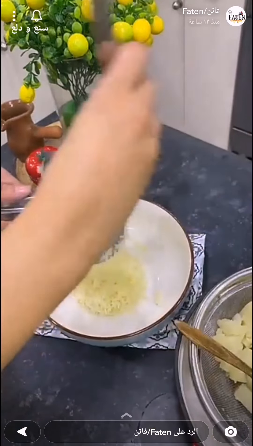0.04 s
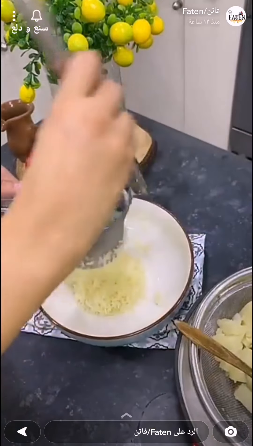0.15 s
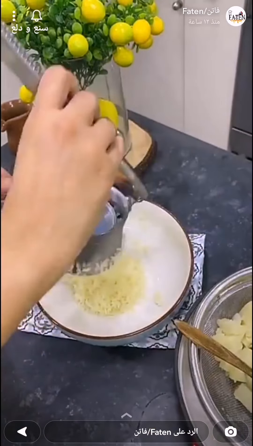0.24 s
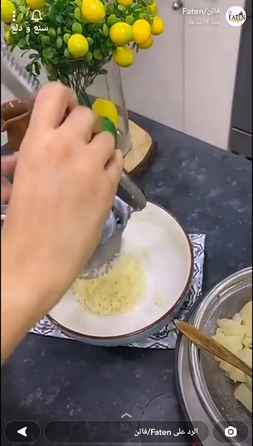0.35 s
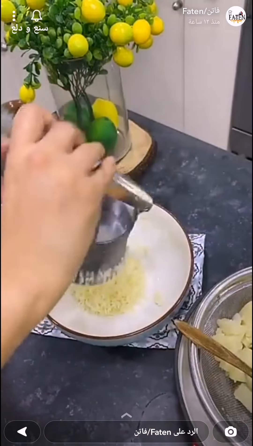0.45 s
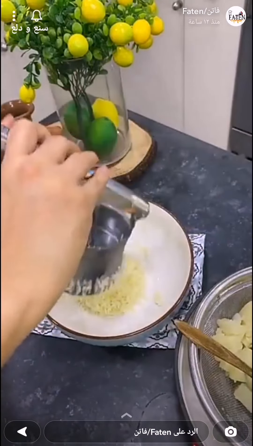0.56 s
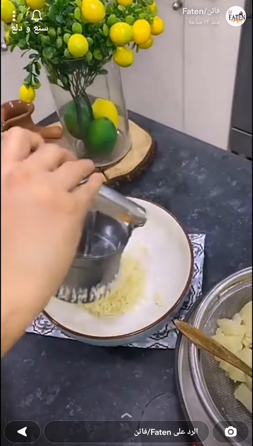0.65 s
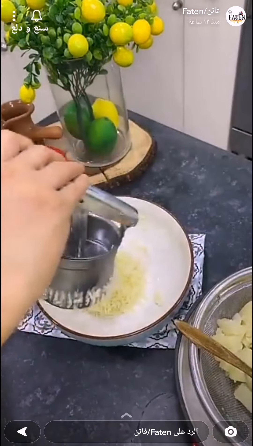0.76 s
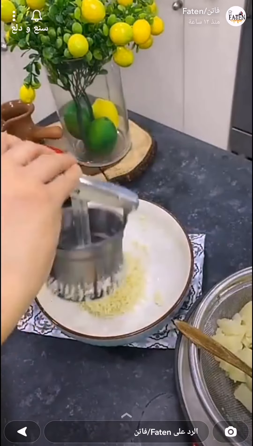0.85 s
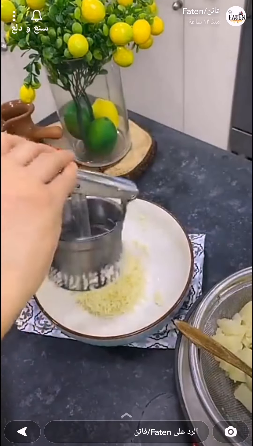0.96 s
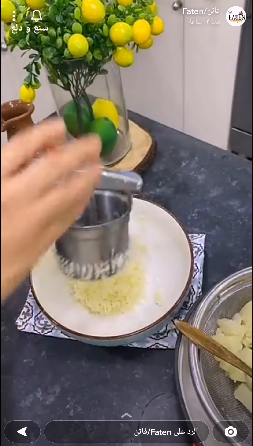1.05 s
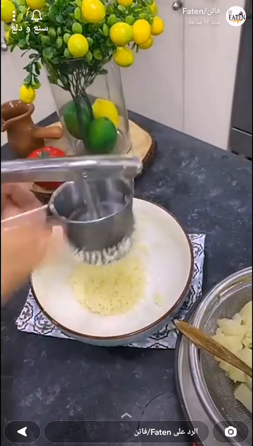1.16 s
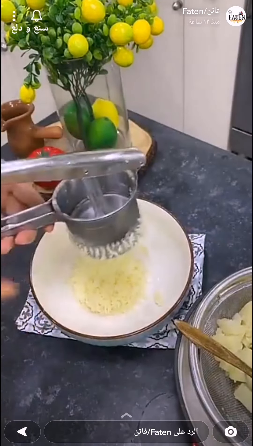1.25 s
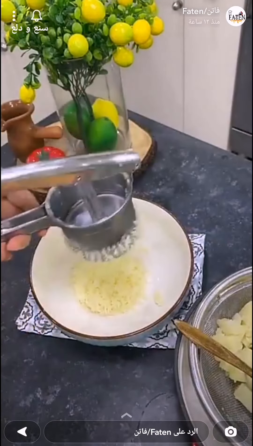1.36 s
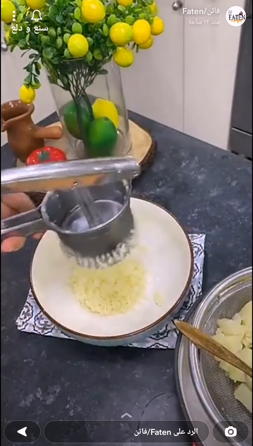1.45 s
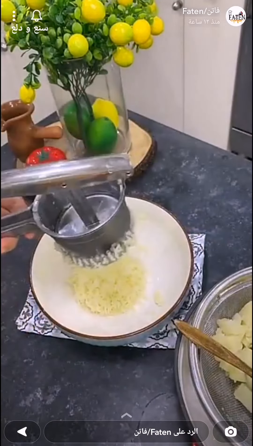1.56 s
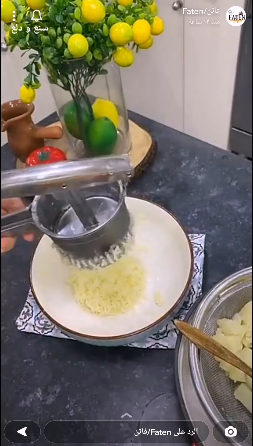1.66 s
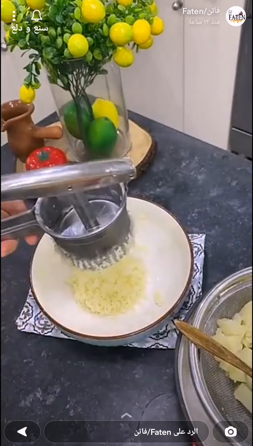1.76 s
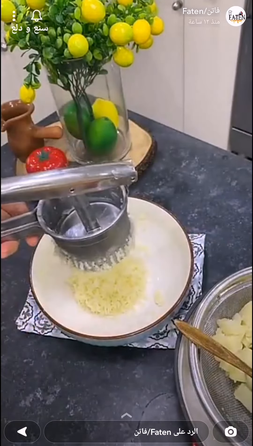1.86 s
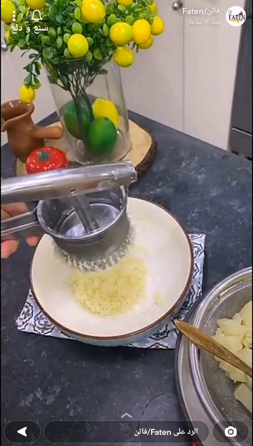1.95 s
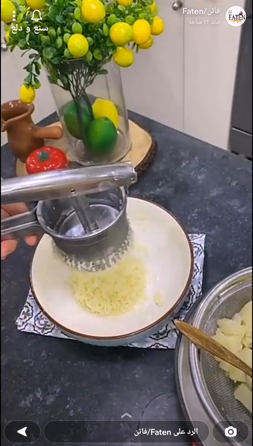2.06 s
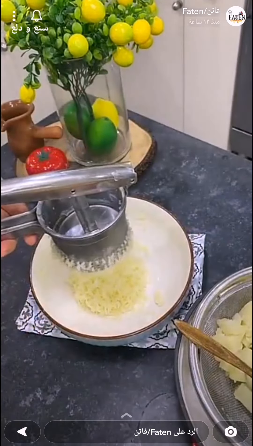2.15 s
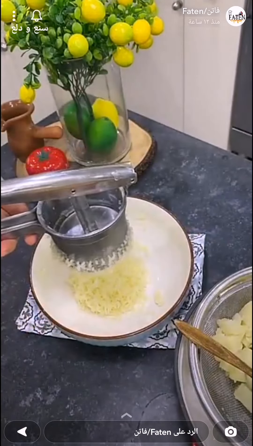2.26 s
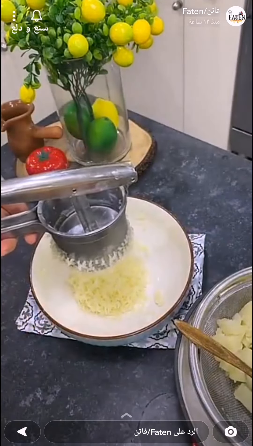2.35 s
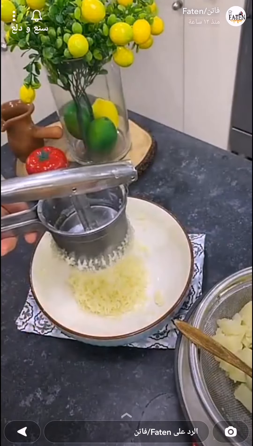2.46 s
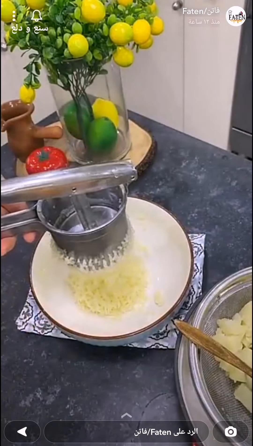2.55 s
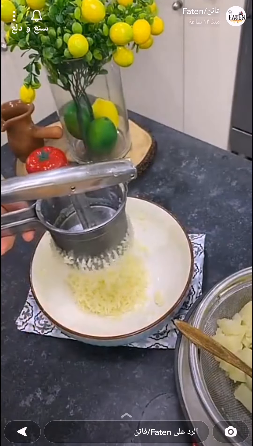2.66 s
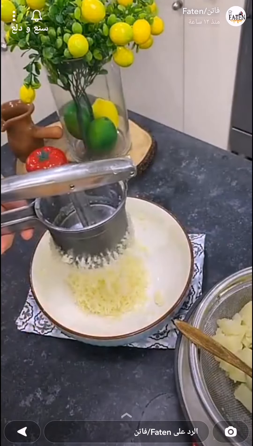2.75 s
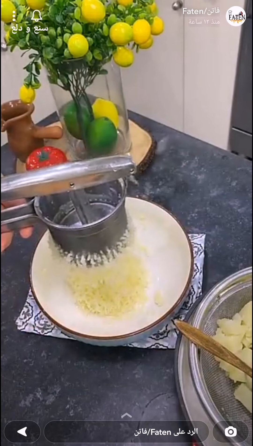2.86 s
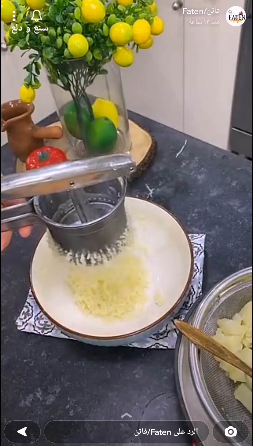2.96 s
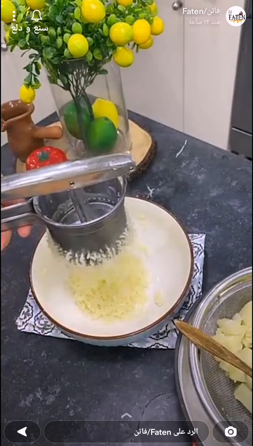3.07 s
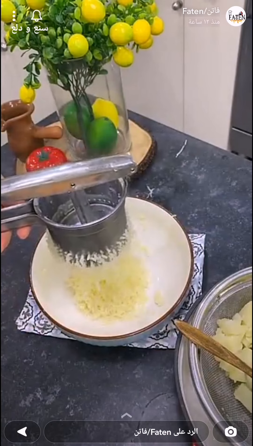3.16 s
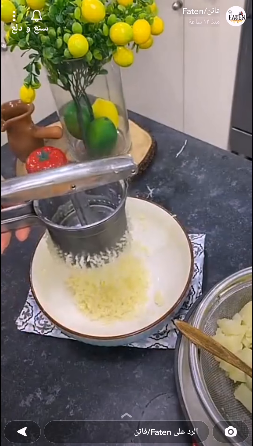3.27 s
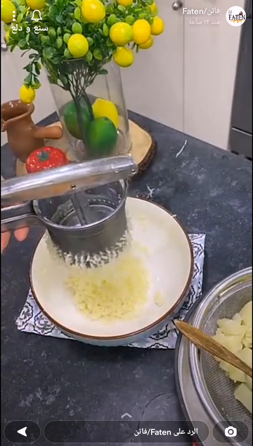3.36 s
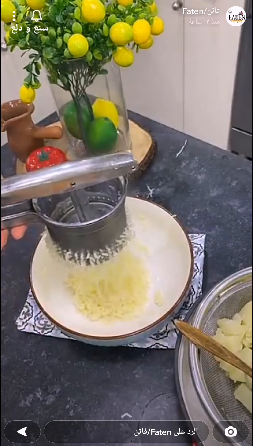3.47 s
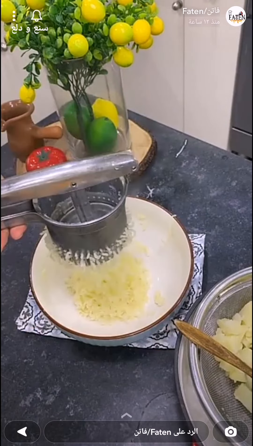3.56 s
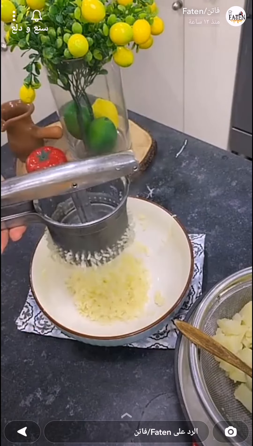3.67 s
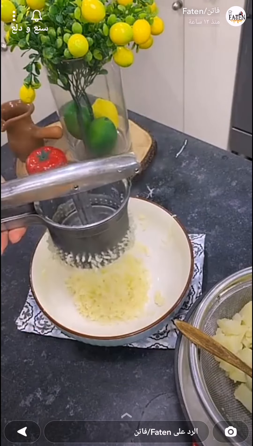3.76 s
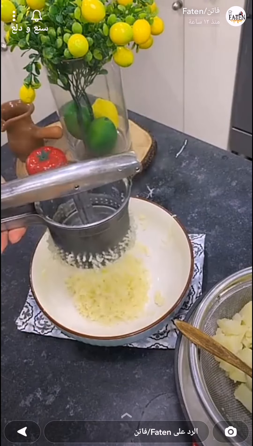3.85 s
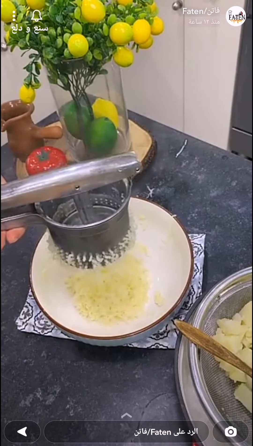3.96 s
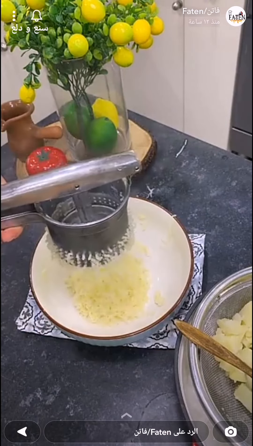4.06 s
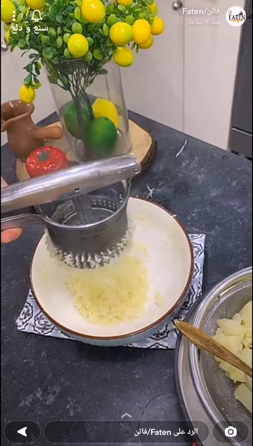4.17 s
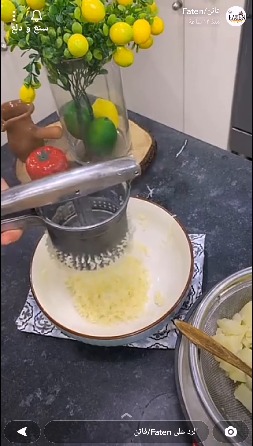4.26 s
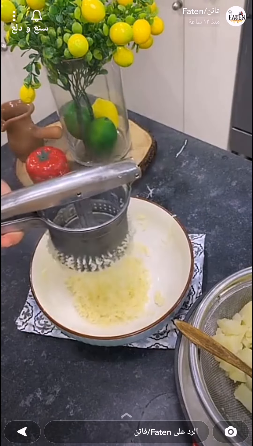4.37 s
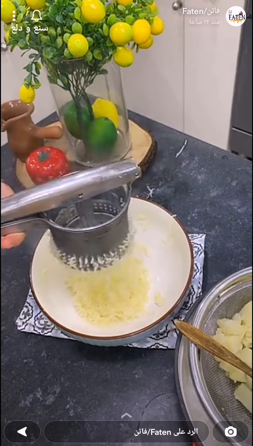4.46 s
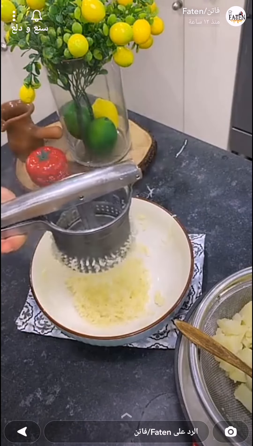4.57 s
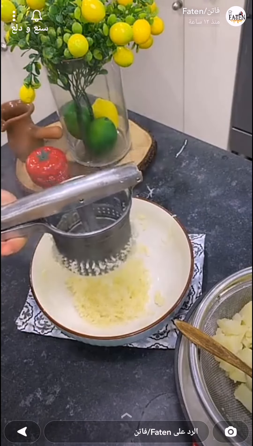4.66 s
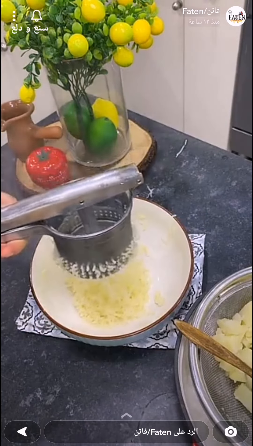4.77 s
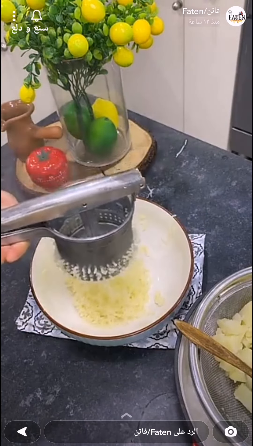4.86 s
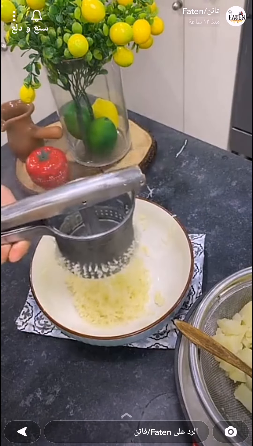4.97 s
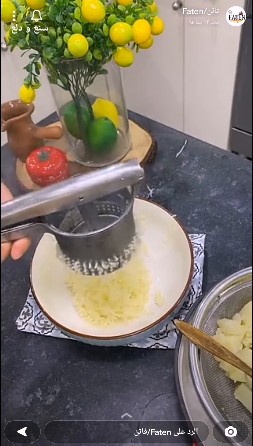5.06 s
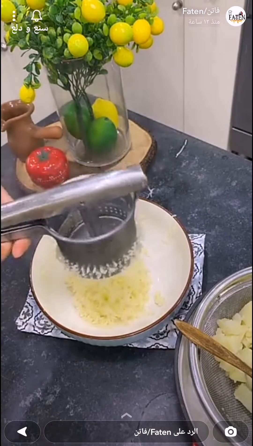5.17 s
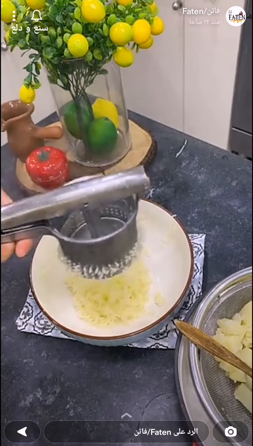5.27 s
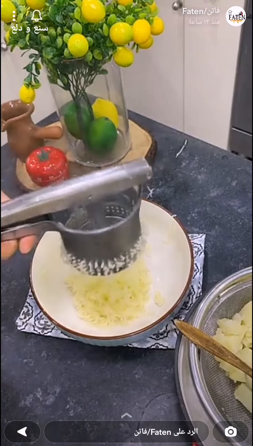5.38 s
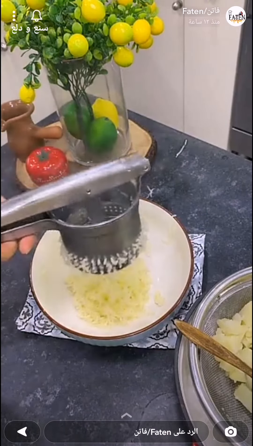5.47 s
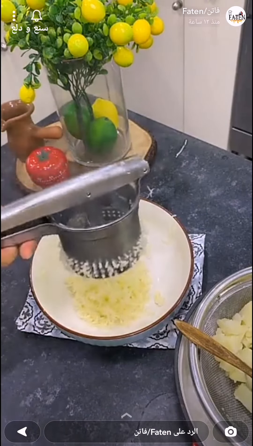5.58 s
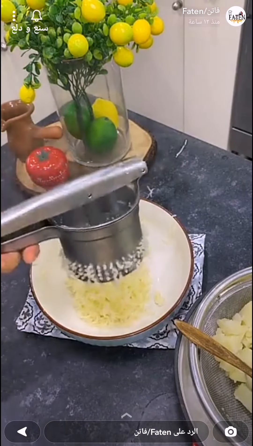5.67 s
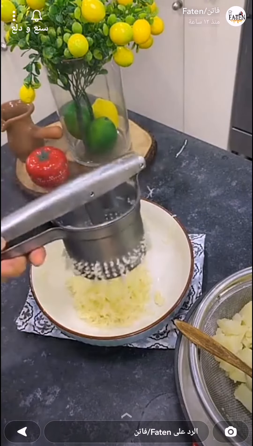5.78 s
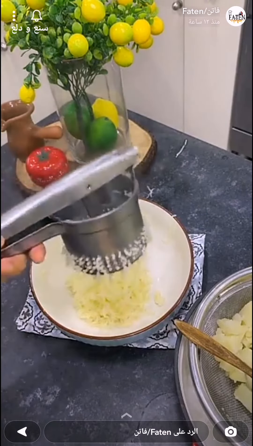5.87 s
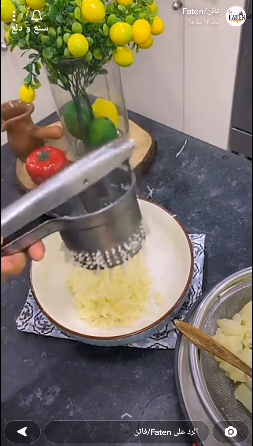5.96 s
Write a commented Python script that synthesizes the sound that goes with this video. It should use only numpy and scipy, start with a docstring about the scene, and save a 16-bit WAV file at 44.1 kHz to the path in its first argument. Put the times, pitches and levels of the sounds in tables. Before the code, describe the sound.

Close to a small microphone, the lever, plunger and cup of a metal potato ricer knock together and slide in short gritty rubs. Two bright clanks stand out, one at the start and one late, with scattered light ticks, hinge jingles and a faint wet crackle of potato between them. Each contact has a brief kitchen echo. Hands rustle faintly over a low appliance hum, and a soft bump closes it.

```python
"""Potato ricer in a kitchen

A hard-walled kitchen, one small microphone within reach of the bowl, appliances humming behind.
A steel ricer is worked by hand: lever, plunger and cup knock together and slide with short gritty
rubs, the loose hinge jingles, and potato crackles wetly through the holes. The walls give every
contact a short wash. Hands rustle faintly, and a soft low bump comes at the end."""
import sys
import numpy as np
from scipy import signal
from scipy.fft import rfft, irfft
from scipy.io import wavfile
from scipy.ndimage import uniform_filter1d

SR = 44100
rng = np.random.default_rng(int(sys.argv[2]) if len(sys.argv) > 2 else 0)


def transcribe(signal):
    """Save signal, clipped to [-1, 1], as a 16-bit WAV file at the path in sys.argv[1]."""
    frames = np.atleast_2d(signal).T
    limited = np.clip(frames, -1, 1)
    pcm = np.round(limited * 32767).astype(np.int16)
    wavfile.write(sys.argv[1], SR, pcm)


N = 265464

# spectrum of the room tone: f/Hz, relative level/dB
ROOM_SPECTRUM = [(24, -54), (40, -13.5), (121, 0), (256, -12.5), (392, -13), (697, -19), (896, -18.5),
                 (1720, -27), (2050, -27), (5180, -53), (6650, -50), (7730, -57), (14500, -35),
                 (15700, -43)]
# wavering appliance tones: f/Hz, width/Hz, level/dB
APPLIANCE_HUMS = [(58.8, 5.3, -74), (89, 15, -65.5), (119.24, 3.7, -64), (206.3, 3.5, -76.5),
                  (290.9, 20, -69.5), (706.5, 15.3, -73.5), (6810, 13, -82)]
# rustle of hands: t/s, level/dB
HAND_LEVELS = [(0.0, -81), (1.1, -74.5), (2.4, -78), (6.02, -71)]
# crackle of potato in the holes: t/s, level/dB
MASH_LEVELS = [(1.3, -78), (1.7, -73), (2.0, -66.5), (2.3, -81), (2.8, -77), (2.95, -77), (3.6, -73),
               (4.0, -98)]
# modes of cup and lever: f/Hz, level/dB, t60/s
STEEL_MODES = [(750, 6, 0.05), (1063.5, 1, 0.33), (1116, 5, 0.11), (1220, 6.5, 0.063), (1390, 6, 0.081),
               (2085, 6.5, 0.052), (2290, 7, 0.052), (2696, -0.5, 0.11), (2940, -2.5, 0.068),
               (3900, 0.5, 0.084), (4680, -5, 0.23), (4950, -8, 0.068), (5230, -10, 0.059),
               (5600, -0.5, 0.05), (6400, -15, 0.13), (6750, -0.5, 0.13), (7200, 1, 0.056),
               (8800, -10, 0.15), (9190, -13.5, 0.015)]
# sliding contacts: full pressure t/s, hold/s, force level/dB, cup gain/dB, treble gain/dB,
# cup f/Hz, lever f/Hz, ring gain/dB, swell/ms
RUB_STROKES = [(0.0, 0.054, -61.5, -11, 0.5, 1050, 4100, 10, 40),
               (0.242, 0.025, -44, -10, 2, 1200, 4950, 4, 23),
               (0.48, 0.038, -56, 4, -19, 1200, 6400, -5, 35),
               (0.499, 0.06, -39, -1, 0.5, 1280, 2940, 0.5, 42),
               (0.525, 0.026, -43, 5.5, -14, 726, 6400, -3.5, 50),
               (1.03, 0.052, -70, 1.5, -1, 1044, 4400, 9, 76),
               (1.685, 0.13, -55, -6, -0.5, 1290, 2240, -20, 53),
               (1.939, 0.11, -55.5, -2.5, -2, 1550, 2990, -4, 45),
               (2.066, 0.035, -42.5, -6.5, -0.5, 787, 2170, -1.5, 24),
               (2.064, 0.054, -47, -9, 2.5, 1390, 3930, -5.5, 31),
               (2.88, 0.027, -61, -8, 2.5, 1200, 4730, -1, 57),
               (2.95, 0.0094, -57.5, -4, -0.5, 1210, 2200, -6, 34),
               (3.08, 0.0073, -58, -22, 0.5, 1210, 2150, -2.5, 49),
               (3.179, 0.016, -50, 0, 2.5, 1116, 5160, -12, 13),
               (4.569, 0.048, -54.5, -17, -1, 1220, 4470, 2, 18),
               (4.968, 0.017, -44, -12, 2, 1070, 4680, -1.5, 9.9),
               (5.451, 0.061, -60, -2, 0, 1450, 2870, 1, 150),
               (5.707, 0.028, -49, -0.5, -2, 1750, 1910, -6, 53)]
# light touches on the loose hinge: t/s, peak level/dB, favoured f/Hz
HINGE_TOUCHES = [(0.001, -44.5, 6140), (0.033, -56.5, 3900), (0.499, -38, 2960), (0.512, -39.5, 3075),
                 (1.057, -57.5, 4600), (1.061, -54, 3280), (1.0896, -53.5, 3900), (1.092, -57, 4600),
                 (3.693, -53.5, 3090), (4.554, -43, 3750), (4.579, -56, 4600), (4.579, -48.5, 3270)]
# modes of the hinge: f/Hz, t60/s
HINGE_MODES = [(2960, 0.076), (3075, 0.072), (3270, 0.1), (3800, 0.059), (3880, 0.15), (4600, 0.11),
               (6200, 0.073)]
# decay of the kitchen's echo: f/Hz, t60/s
WALL_DECAY = [(500, 0.23), (1500, 0.52), (4000, 0.45), (8000, 0.44), (14000, 0.19)]
# steel striking steel: t/s, peak level/dB, cup gain/dB, treble gain/dB,
# cup f/Hz, lever f/Hz, rise/ms, ring gain/dB
KNOCK_HITS = [(0.2233, -32, -15, 6, 1200, 5900, 0.91, 3), (0.2249, -18, -6, 2, 1125, 5370, 3.9, 0),
              (0.2382, -23.5, -13, -26, 1100, 4950, 2.8, -4), (0.2977, -30, 8, -18, 1140, 2950, 4.4, 8),
              (1.0889, -42, -13, -4.5, 1220, 4000, 2, -3), (1.32, -26.5, -13, 4.5, 1030, 4270, 1.09, -19),
              (1.686, -47.5, -3, -22, 1220, 2060, 1.4, 15), (1.765, -45.5, -7, 2.5, 1290, 2700, 0.78, 4),
              (1.936, -45, -14, 2, 1210, 4100, 6, 3), (1.991, -43.5, -35, 8, 1220, 2290, 5.2, 6),
              (2.0612, -38, -11, 5, 1290, 2130, 3.2, -2), (2.0802, -36, 4, -16, 1420, 2090, 1.1, -2),
              (3.168, -34.5, -16, -2.5, 1030, 4870, 0.91, 0), (3.277, -48, 0, 6, 1220, 5000, 4.3, -4),
              (3.694, -37, 3, 3, 1000, 2520, 1.1, -2), (4.15, -53, -1, 0.5, 724, 1930, 7.9, -3),
              (4.55, -34, -4, -28, 1220, 3900, 0.7, -7), (4.566, -43, -7, -2, 1230, 5800, 3.8, 3),
              (4.579, -32.5, 6, -5, 1300, 3500, 1.7, 3.5), (4.633, -39, -4, -20, 1080, 4400, 1.9, 9),
              (4.954, -16.5, -6.5, 0.5, 1097, 4600, 3.7, 3),
              (4.9585, -16.5, -10, -7.5, 1100, 5600, 1.23, -1), (4.96, -25, -16, -16, 1070, 2290, 1.6, 0),
              (5.709, -44.5, 16, -28, 980, 2190, 4.8, -7)]
# the low bump: t/s, peak level/dB, f/Hz, swell/s
BUMP = (5.976, -46, 95, 0.013)

ROOM_DB, WALL_DB, WALL_DELAY_S = -60, -8.5, 0.0075
CUP_TOP_HZ, TREBLE_FROM_HZ = 1600, 7500   # the lever's modes lie between
DIPS_HZ, DIP_Q = [1683, 3514, 7530], 21   # pitches where the ricer's sound is faint
RUB_LEAD_S, SWELL_DB, SAG_DB_PER_S, LIFT_DB_PER_S = 0.05, 30, 38, 262
KNOCK_CREST = 6   # peak power over the mean power of the loudest moment


def from_db(db):
    return 10 ** (np.asarray(db) / 20)


def rms_one(x):
    return x / np.sqrt(np.mean(x ** 2) + 1e-20)


def at_hz(points, hz):
    return np.interp(np.log(hz), np.log(np.array(points)[:, 0]), np.array(points)[:, 1])


def band(x, low_hz, high_hz, count=1):
    """A band-pass, applied count times."""
    sos = signal.butter(2, [low_hz, high_hz], "band", fs=SR, output="sos")
    return signal.sosfilt(np.tile(sos, (count, 1)), x)


def grit(size, per_s, spread_db):
    """Random micro-contacts of uneven size over a little hiss; rms 1."""
    sizes = from_db(spread_db * np.minimum(rng.exponential(1, size), 4)) * rng.choice([-1, 1], size)
    return rms_one(sizes * (rng.random(size) < per_s / SR) + 0.21 * rng.standard_normal(size))


def room_tone():
    """Steady air all round the microphone, with the appliance tones wavering in it."""
    hz = np.maximum(np.fft.rfftfreq(N, 1 / SR), 1)
    spectrum = rfft(rng.standard_normal(N)) * from_db(at_hz(ROOM_SPECTRUM, hz))
    air = from_db(ROOM_DB) * rms_one(irfft(spectrum, N))
    for tone_hz, width_hz, level_db in APPLIANCE_HUMS:
        narrow = 1 / (1 + ((hz - tone_hz) / width_hz * 2) ** 2)
        air += from_db(level_db) * rms_one(irfft(rfft(rng.standard_normal(N)) * narrow, N))
    return air


def hand_rustle():
    """Hands on the ricer: fine bright grains whose level drifts."""
    level_db = np.interp(np.arange(N) / SR, *np.transpose(HAND_LEVELS))
    return from_db(level_db) * rms_one(band(grit(N, per_s=4000, spread_db=1.5), 1300, 8900))


def mash_crackle():
    """Potato squeezes through the holes above the bowl: tiny, very bright wet pops in clumps."""
    level_db = np.interp(np.arange(N) / SR, *np.transpose(MASH_LEVELS))
    clumps = rms_one(band(rng.standard_normal(N), 4.9, 40))
    pops = rms_one(band(grit(N, per_s=600, spread_db=1.8), 4400, 17000))
    return from_db(level_db + 1.5 * clumps) * pops


def ring(x, hz, t60):
    """One mode; the power it takes from noise does not depend on its decay."""
    r, w = from_db(-60 / (t60 * SR)), 2 * np.pi * hz / SR
    gain = 2 * np.sqrt(1 - r * r) * np.sin(w)
    return signal.lfilter([0, gain], [1, -2 * r * np.cos(w), r * r], x + 1e-18)


def contact_gains(size, spread_db):
    """A gain for each mode that wanders every 20 ms as the point of contact moves."""
    nodes = from_db(spread_db * rng.normal(0, 1, (len(STEEL_MODES), 40)))
    steps = np.arange(size) / SR / 0.02
    return [np.interp(steps, np.arange(40), row) for row in nodes]


def small_modes(x, t60=0.025):
    """Countless small modes of the steel, new for each contact, add an uneven ringing colour."""
    t = np.arange(SR // 16) / SR
    body = rms_one(rng.standard_normal(len(t)) * from_db(-60 * t / t60)) / np.sqrt(len(t))
    rung = signal.fftconvolve(np.atleast_2d(x), body[None])[:, :x.shape[-1]]
    return from_db(-3) * x + from_db(-6) * rung


def steel(force, cup_db, treble_db, cup_hz, lever_hz, ring_db, t60_scale, wander_db, detune):
    """A force rings the modes near cup_hz and lever_hz. Rows: to the microphone, to the walls."""
    gains = contact_gains(force.shape[-1], wander_db)
    rung = np.zeros(force.shape)
    for (hz, level_db, t60), gain in zip(STEEL_MODES, gains):
        if hz < CUP_TOP_HZ:
            share_db = cup_db - 44 * abs(np.log2(hz / cup_hz))
        elif hz > TREBLE_FROM_HZ:
            share_db = treble_db
        else:
            share_db = -18 * min(abs(np.log2(hz / lever_hz)), 1)
        gripped_hz = hz * (1 + detune * rng.normal())   # the grip shifts each mode a little
        rung += ring(force * gain * from_db(share_db + level_db), gripped_hz, t60 * t60_scale)
    # part of the force radiates as broad bands of noise
    noise = from_db(10 + cup_db) * band(force, cup_hz / 1.25, cup_hz * 1.24, count=2)
    noise += band(force, 1590, TREBLE_FROM_HZ, count=2)
    noise += from_db(-5) * band(force, lever_hz / 1.15, lever_hz * 1.15)
    treble = force * from_db(treble_db)
    noise += band(treble, TREBLE_FROM_HZ, 10800) + from_db(-3) * band(treble, 12800, 15300)
    ring_share = from_db([[0], [-6]])   # less of the clear ring goes to the walls
    return from_db(ring_db - 16) * rung * ring_share + small_modes(noise)


def rubs():
    """Steel slides on steel and wet mash: clumped grit that swells, sags while held and dies away."""
    lead = round(RUB_LEAD_S * SR)
    out = np.zeros((2, lead + N + SR))
    t = np.arange(lead + SR // 4) / SR - RUB_LEAD_S
    for full_s, hold_s, level_db, cup_db, treble_db, cup_hz, lever_hz, ring_db, swell_ms in RUB_STROKES:
        shape_db = SWELL_DB * np.minimum(t * 1000, 0) / swell_ms
        shape_db -= SAG_DB_PER_S * np.clip(t, 0, hold_s) + LIFT_DB_PER_S * np.maximum(t - hold_s, 0)
        clumps = rms_one(band(rng.standard_normal(len(t)), 21, 256))   # stick and slip
        force = grit(len(t), per_s=700, spread_db=3.7) * from_db(level_db + shape_db + 1.76 * clumps)
        at = round(full_s * SR)
        out[:, at:at + len(t)] += steel(force, cup_db, treble_db, cup_hz, lever_hz, ring_db,
                                        t60_scale=0.48, wander_db=5, detune=0.025)
    return out[:, lead:lead + N]


def hinge_jingles():
    """Light touches set the free hinge parts ringing, most of all the mode near the favoured pitch."""
    out = np.zeros(N)
    times_s, peaks_db, favoured_hz = np.transpose(HINGE_TOUCHES)
    at = np.round(times_s * SR).astype(int)
    for hz, t60 in HINGE_MODES:
        clicks = np.zeros(N)
        clicks[at] = from_db(peaks_db - 300 * np.abs(np.log2(hz / favoured_hz)))
        ringing = ring(clicks, hz, t60)
        out += ringing * np.max(clicks) / np.abs(ringing).max()
    return out


def wall_wash(x):
    """Diffuse echoes off the hard walls reach the microphone after a short gap and die band by band."""
    t, edges = np.arange(SR // 2) / SR, 300 * 2 ** np.arange(0, 6.1, .5)
    white = rng.standard_normal((2, len(t)))
    echo = np.zeros(len(t))
    for k, (low, high) in enumerate(zip(edges, edges[1:])):
        t60 = at_hz(WALL_DECAY, np.sqrt(low * high))
        echo += band(white[k % 2], low, high) * from_db(-60 * t / t60)
    echo *= np.clip(t / WALL_DELAY_S - 1, 0, 1)
    return signal.fftconvolve(x, echo / np.sqrt(np.sum(echo ** 2)))[:N]


def knocks():
    """Steel strikes steel: brief chatter at the microphone, one even click as the walls hear it."""
    out, t = np.zeros((2, N + SR)), np.arange(SR // 8) / SR
    for start_s, peak_db, cup_db, treble_db, cup_hz, lever_hz, rise_ms, ring_db in KNOCK_HITS:
        rise = t * 1000 / rise_ms
        chatter = grit(len(t), per_s=9000, spread_db=4.4) * rise * np.exp(1 - rise ** 1.28)
        click = np.sqrt(np.sum(chatter ** 2)) * (t == 0) * from_db(1)
        sound = steel(np.array([chatter, click]), cup_db, treble_db, cup_hz, lever_hz, ring_db,
                      t60_scale=1, wander_db=2, detune=0.008)
        loudest_power = uniform_filter1d(sound[0] ** 2, size=60).max()
        at = round(start_s * SR)
        out[:, at:at + len(t)] += from_db(peak_db) * sound / np.sqrt(KNOCK_CREST * loudest_power)
    return out[:, :N]


def low_bump():
    """A soft low tone that swells and fades in a moment."""
    start_s, peak_db, hz, swell_s = BUMP
    t = np.maximum(np.arange(N) / SR - start_s, 0)
    return from_db(peak_db) * t / swell_s * np.exp(1 - t / swell_s) * np.sin(2 * np.pi * hz * t)


def scene():
    """At the microphone, in mono: the ricer in front, the walls and the room tone behind."""
    direct, to_walls = knocks() + rubs() + hinge_jingles()
    ricer = direct + from_db(WALL_DB) * wall_wash(to_walls)
    bass_cut = signal.butter(6, 660, "high", fs=SR, output="sos")   # too small to radiate bass
    ricer = signal.sosfilt(bass_cut, ricer)
    for dip_hz in DIPS_HZ:
        ricer = signal.lfilter(*signal.iirnotch(dip_hz, DIP_Q, SR), ricer)
    return (ricer + room_tone() + hand_rustle() + mash_crackle() + low_bump())[None]


def record(dry):
    """The small microphone loses the deepest bass; the top is cut."""
    thin = signal.sosfilt(signal.butter(4, 50, "high", fs=SR, output="sos"), dry)
    return signal.sosfilt(signal.cheby2(12, 60, 16500, fs=SR, output="sos"), thin)


dry = scene()
out = record(dry)
transcribe(out)
```